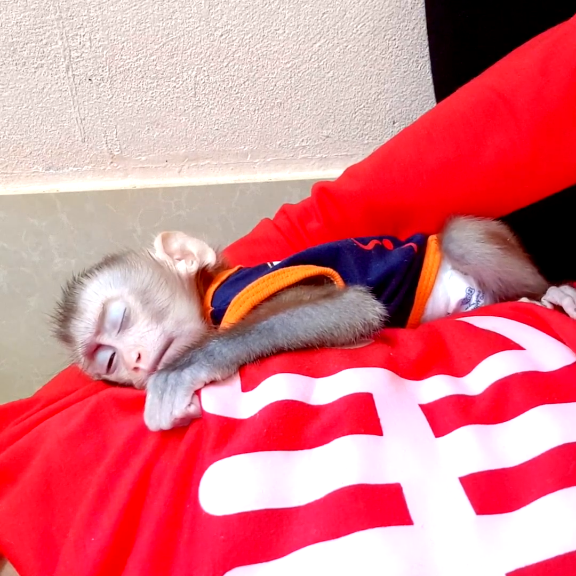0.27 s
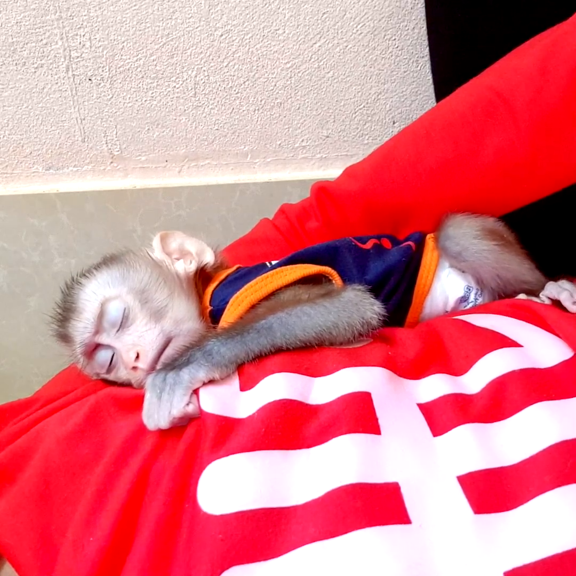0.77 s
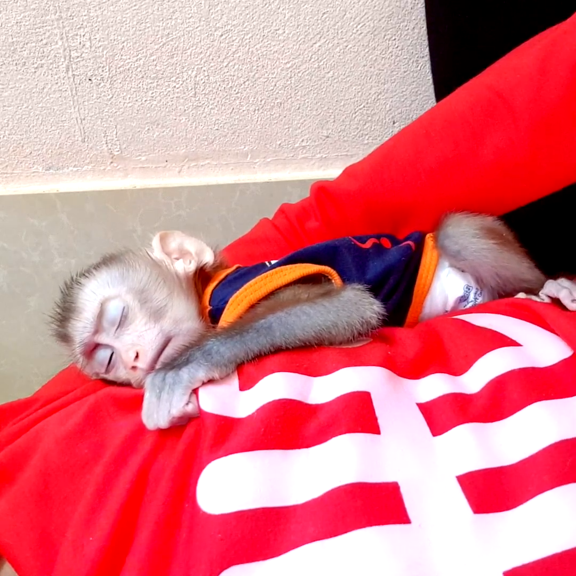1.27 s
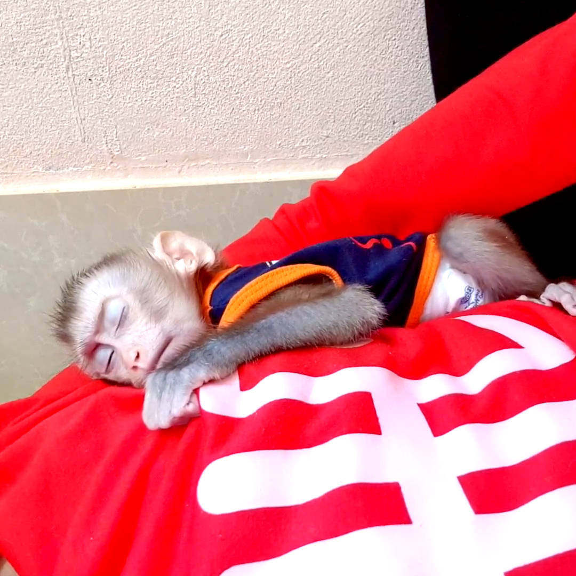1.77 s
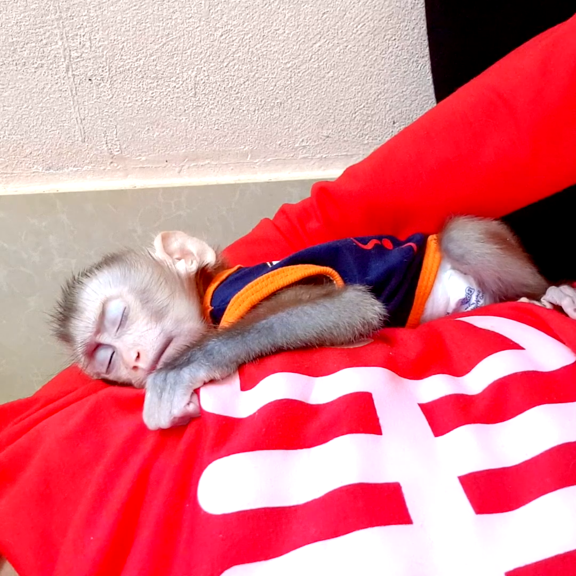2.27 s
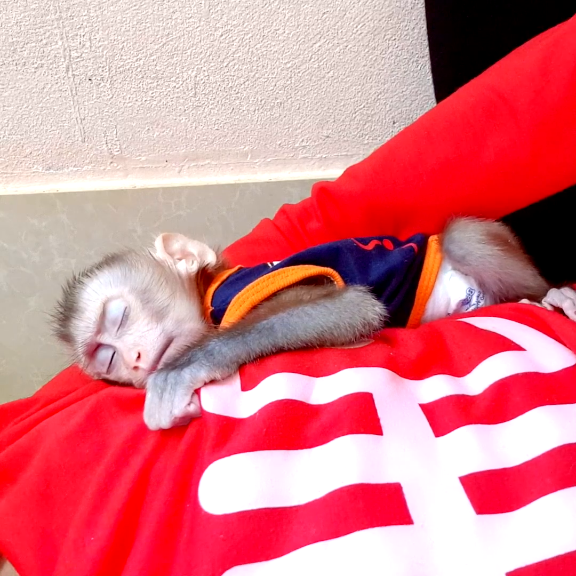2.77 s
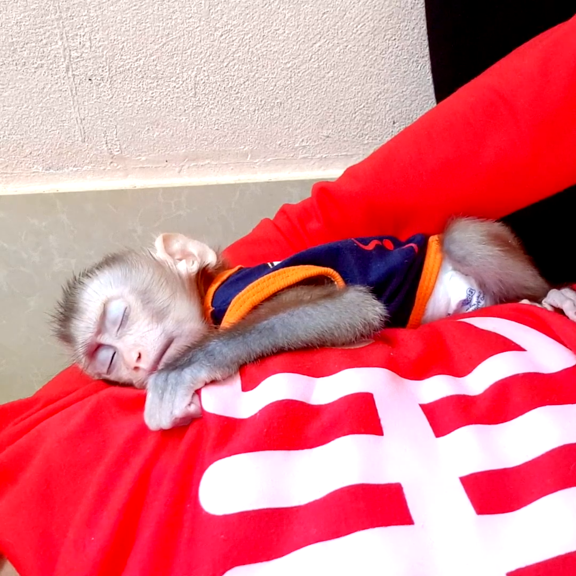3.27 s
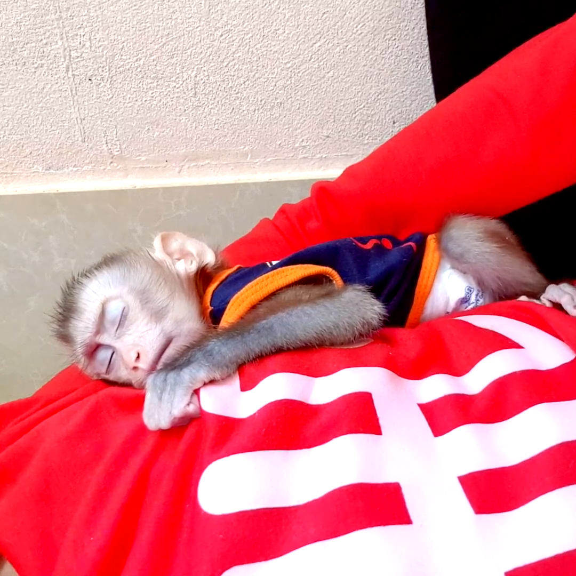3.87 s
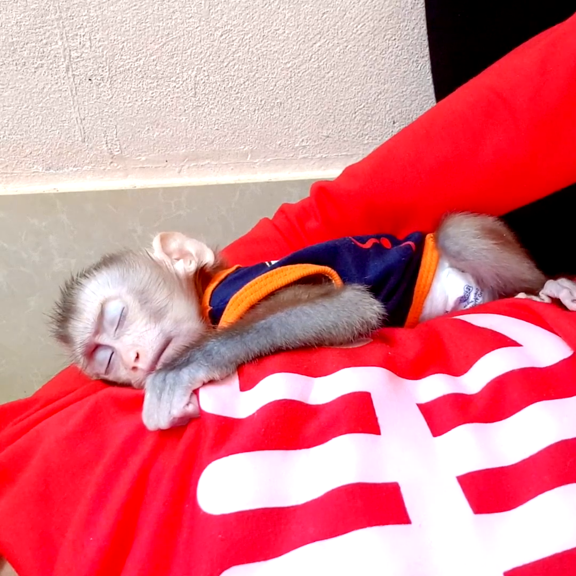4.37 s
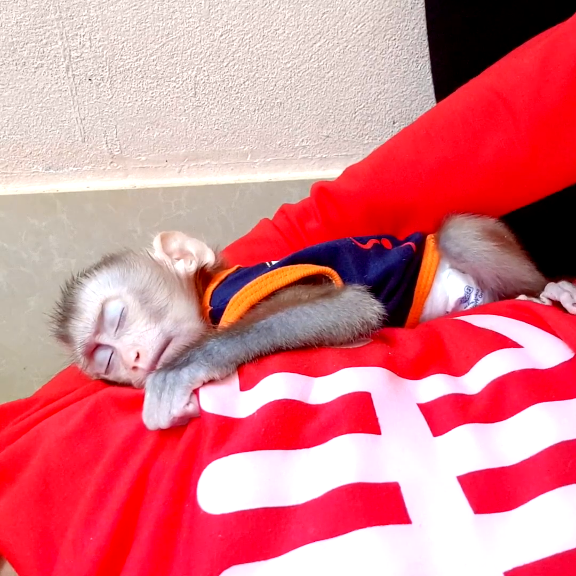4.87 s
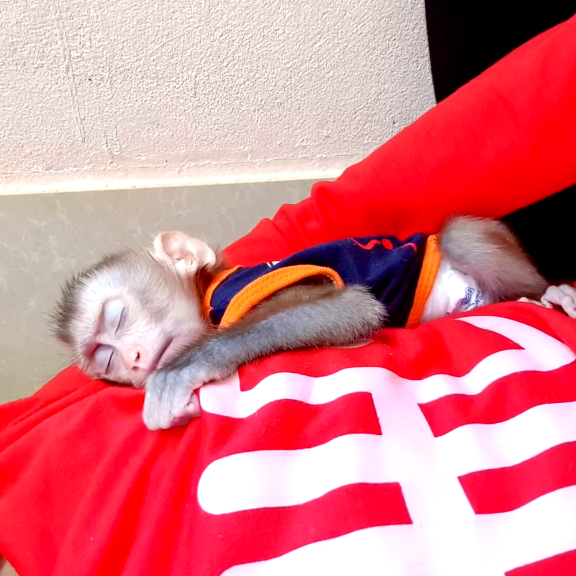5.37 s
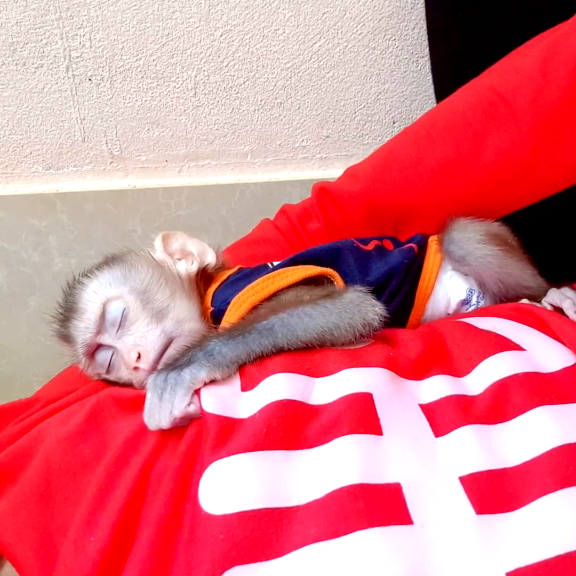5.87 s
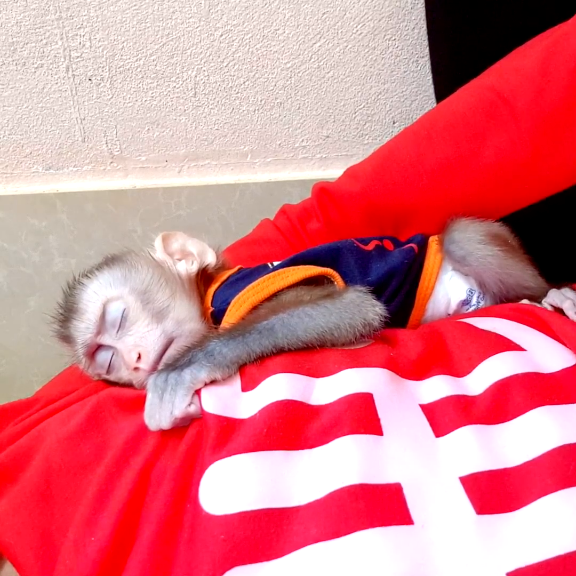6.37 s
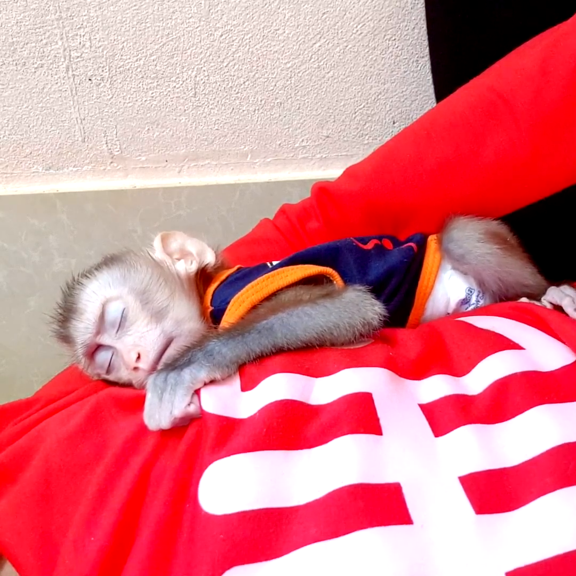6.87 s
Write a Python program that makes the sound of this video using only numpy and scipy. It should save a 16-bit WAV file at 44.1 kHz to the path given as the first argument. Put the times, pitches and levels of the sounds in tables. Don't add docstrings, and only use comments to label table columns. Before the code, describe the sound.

A far animal repeats a squeaky rising call breaking into a hoarse two-toned bray, echoing over a steady low machine hum and room noise.

```python
import sys
import numpy as np
from scipy import signal
from scipy.fft import rfft, irfft, next_fast_len
from scipy.io import wavfile
from scipy.ndimage import map_coordinates

SR = 44100
rng = np.random.default_rng(int(sys.argv[2]) if len(sys.argv) > 2 else 0)


def gain_from_db(level_db):
    decades = np.asarray(level_db, float) / 20
    return 10 ** decades


def log_audio(samples):
    frames = np.atleast_2d(samples).T
    limited = np.clip(frames, -1, 1)
    pcm = np.round(limited * 32767).astype(np.int16)
    wavfile.write(sys.argv[1], SR, pcm)


N = 313110
TIME = np.arange(N) / SR


def unit(x):
    return x / np.sqrt(np.mean(x ** 2) + 1e-20)


def along(points, hz):
    f, value = np.transpose(points)
    return np.interp(np.log(hz + 1), np.log(f + 1), value)


def wobble(rate):
    knots = rng.standard_normal(int(N * rate / SR) + 4)
    return map_coordinates(knots, [np.arange(N) * rate / SR])


def phase(hz):
    return 2 * np.pi * np.cumsum(hz) / SR


def filtered(x, response):
    m = next_fast_len(N + 8192)
    return irfft(rfft(x, m) * response(np.fft.rfftfreq(m, 1 / SR)), m)[..., :N]


def noise(spectrum):
    return unit(filtered(rng.standard_normal(N), lambda hz: gain_from_db(along(spectrum, hz))))


def spans(starts, lengths, fade):
    k = np.clip(np.searchsorted(starts, TIME + .02) - 1, 0, None)
    age = TIME - starts[k]
    return k, age, np.clip(np.minimum(age + fade, lengths[k] + fade - age) / fade, 0, 1)


# f/Hz, correlation
LIKENESS = [(60, 0.7097), (180, 0.9273), (550, 0.5242), (1650, -0.238), (4970, 0.191), (15000, -0.165)]


def rush(spectrum):
    def colour(hz):
        turn = np.arccos(np.clip(along(LIKENESS, hz), -1, 1)) / 2
        return gain_from_db(along(spectrum, hz)) * [np.cos(turn), np.sin(turn)]

    mid, side = filtered(rng.standard_normal((2, N)), colour)
    return unit(np.array([mid + side, mid - side]))


# f/Hz, level/dB per Hz
RUMBLE_COLOUR = [(22, -47.5), (35, -8), (48, 0), (70, 3.5), (100, 0), (130, -3.5), (170, -9), (220, -22),
                 (400, -21.5), (500, -54)]
# t/s, level/dB
TRAFFIC = [
    (0.15, -53),
    (1.74, -53),
    (1.76, -55.5),
    (2.31, -51.5),
    (3.48, -54),
    (3.96, -52),
    (4.41, -55),
    (6.13, -52.5),
    (6.95, -54),
]
# f/Hz, level/dB per Hz
AIR_COLOUR = [(120, -36), (200, -6), (290, -5.5), (330, -10.5), (420, -6.5), (560, -10.5), (800, -7),
              (1100, -9.5), (1600, -15.5), (2000, -18), (2500, -23), (3100, -32.5), (4200, -47),
              (6000, -85.5)]
# f/Hz, level/dB per Hz
HISS_COLOUR = [(2500, -43.5), (3500, 2), (5500, 2), (7000, 3), (8800, -29.5), (10200, -4.5), (11500, 0.5),
               (15800, 1)]


def room():
    times, levels = np.transpose(TRAFFIC)
    swell_db = np.interp(TIME, times, levels)
    swell_db = swell_db - swell_db.mean()
    rumble = gain_from_db(-50.5 + swell_db) * rush(RUMBLE_COLOUR) * gain_from_db([[-1.2], [1.2]])
    hiss = gain_from_db(-77) * np.array([noise(HISS_COLOUR), noise(HISS_COLOUR)])
    air = gain_from_db(-57.5 + 0.067 * swell_db) * rush(AIR_COLOUR)
    return rumble + hiss + air


# f/Hz, level/dB, left-right/dB, left lead/rad, level sway/0-1, sway start/rad,
# pitch sway/rad, pitch sway start/rad
SHAFT_ORDERS = [
    (38.5, -50, -5.3, .66, .14, -2.1, .08, -.95),
    (77.0, -46, -3.3, .34, .24, 2.63, .75, .84),
    (115.5, -66, -2, .3, .2, 0, .3, 0),
]
# f/Hz, level/dB
SIDE_TONES = [(43.7, -70.5), (94.7, -67.5), (100, -58.5), (130.8, -72.5), (177, -70.5)]


def machine():
    out = np.zeros((2, N))
    belt = 2 * np.pi * 3.05 * TIME
    ports = np.array([[.5], [-.5]])
    for hz, db, pan_db, lead, sway, start, swing, swing_start in SHAFT_ORDERS:
        turn = 2 * np.pi * hz * TIME + swing * np.sin(belt + swing_start) + lead * ports
        level = gain_from_db(db + 3 + pan_db * ports + .4 * wobble(3))
        out += level * (1 + sway * np.cos(belt + start)) * np.sin(turn)
    for hz, db in SIDE_TONES:
        out += gain_from_db(db + 3 + 1.2 * wobble(2)) * np.sin(2 * np.pi * hz * TIME + .25 * ports)
    return out


# peak t/s, level/dB, rise/s per 10 dB, fall/s per 10 dB
TONE_SWELLS = [
    (1.3, -52, 0.0397, 0.0556),
    (2.45, -52, 0.40533, 0.115),
]


def passing_tone():
    level = 0
    for peak_s, db, rise_s, fall_s in TONE_SWELLS:
        away = np.maximum((peak_s - TIME) / rise_s, (TIME - peak_s) / fall_s)
        level = level + gain_from_db(db + 4.0 - 10 * away)
    return level * np.sin(phase(151 + 1.2838 * wobble(3.9713)))


# t/s, f/Hz, level/dB, t60/s
BUMP = (3, 67, -41, 0.003)


def bump():
    start_s, hz, db, t60 = BUMP
    age = np.clip(TIME - start_s, 0, None)
    return gain_from_db(db - 60 * age / t60) * (1 - np.exp(-age / 0.0082)) * np.sin(2 * np.pi * hz * age)


# t/s, length/s, level/dB, lower edge f/Hz, upper roll-off f/Hz
NOSE_PUFFS = [
    (1.652, 0.28113, -68.5, 4148, 5447),
    (2.27, 0.2463, -57, 3849, 5982),
    (3.501, 0.2543, -61, 1822, 2164),
    (6.93, 0.3322, -52, 3835, 4218),
]


def puffs():
    out = np.zeros((2, N))
    for start, length, db, low_hz, top_hz in NOSE_PUFFS:
        air = filtered(rng.standard_normal((2, N)),
                       lambda f: 1 / (1 + (low_hz / (f + 1)) ** 24) / (1 + (f / top_hz) ** 7))
        attack = np.clip((TIME - start) / 0.03374, 0, 1)
        release = np.clip((start + length - TIME) / 0.20976, 0, 1)
        out += gain_from_db(db) * unit(air) * attack * release
    return out


# f/Hz, t60/s
YARD_DECAY = [(700, 0.9506), (2000, 0.88425), (5000, 0.64136), (12000, 0.3076)]


def yard(x):
    out = np.zeros((2, N + 2 * SR))
    step = SR // 4
    window = np.hanning(2 * step)
    for at in range(-step, N, step):
        first = max(at, 0)
        part = x[first:at + 2 * step] * window[max(-at, 0):][:N - first]
        hz, t, z = signal.stft(rng.standard_normal((2, SR)), SR, nperseg=256)
        t60 = np.clip(along(YARD_DECAY, hz), .05, 3)
        tail = signal.istft(z * gain_from_db(-60 * t / t60[:, None]), SR, nperseg=256)[1]
        tail = tail / np.sqrt(t60.mean()) / np.sqrt(SR / 14)
        wet = signal.fftconvolve(part[None], tail, axes=1)
        out[:, first:][:, :wet.shape[1]] += wet
    return out[:, :N]


# t/s, length to the release/s, peak level/dB, brightness/dB
BREATHS = [
    (-.5, 0.47194, -52.5, -26.5),
    (.55, .465, -46, -11.5),
    (2.22, 0.3298, -54.5, -19),
    (2.469, 0.3573, -46.5, -13),
    (3.835, 0.4662, -51, -12),
    (5.023, 0.50688, -48.5, -9.5),
    (6.201, 0.71167, -49.5, -11),
]
# f/Hz, level/dB per Hz
THROAT_COLOUR = [(520, -29), (700, -20.5), (850, -7.5), (1100, -0.5), (1410, -8.5), (1700, -11), (1910, -8),
                 (2230, -14.5), (2650, -17.5), (3400, -20), (4500, -21), (6500, -24), (8000, -35),
                 (10400, -109)]
# f/Hz, level/dB per Hz
RASP_COLOUR = [(6000, -4.5), (7800, -4), (9000, -7.5), (10500, -6), (11500, -9), (12500, -12),
               (15500, -44.5)]


def hoarse():
    flow, rasp = np.zeros((2, N))
    attack_s, full_s, release_s = 0.044424, 0.21545, 0.19406
    for start, length, db, bright_db in BREATHS:
        age = TIME - start
        spent = np.clip((age - length) / release_s, 0, 1)
        arc_db = np.interp(age, [0, attack_s, full_s, length, length + release_s],
                           [-26, -6.5, 0, -7.5, -34])
        air = (age > 0) * (spent < 1) * gain_from_db(db + arc_db)
        forced_db = 13 * np.exp(-((age - 0.12099) / 0.05452) ** 2)
        flow += air
        rasp += air * gain_from_db(bright_db + forced_db - 34.5 * spent)
    unsteady = gain_from_db(4.046 * wobble(30))
    return unsteady * (flow * gain_from_db(7.0) * noise(THROAT_COLOUR) + rasp * gain_from_db(-4.5) * noise(RASP_COLOUR))


# t/s, top line f/Hz, then peak level/dB of the upper, middle and lower lines
BRAY_CALLS = [
    (-.31, 2181, -50, -46, -50),
    (0.798, 2201, -52, -56, -55.5),
    (2.25, 2188, -57.5, -51, -60.5),
    (4.031, 2179, -50, -50.5, -55.5),
    (5.252, 2189, -46, -54, -58),
    (6.521, 2146, -45, -56.5, -52),
]
# f/Hz, level/dB
UPPER_LINES = [(2195, 2.5), (4390, -12.5)]
MIDDLE_LINES = [(1620, 0), (1905, 2), (2465, -9.5), (2760, -20.5), (3830, -15.5), (4110, -14.5)]
LOWER_LINES = [(570, -15), (860, -2), (1020, -5.5), (1090, -3.5), (1315, 1.5)]
# peak at share of the length, gain before/dB, loss after/dB
GROUP_ARCS = [(0.33733, 22, 22), (0.1899, 5.5, 15.5), (0.658, -2.5, 3.5)]


def bray():
    length_s, attack_s = 0.36495, 0.01896
    starts, top_hz, *peaks = np.transpose(BRAY_CALLS)
    k, age, gate = spans(starts, np.full(len(starts), length_s), fade=0.016)
    slide = top_hz[k] / 2195
    out = 0
    for table, peak_db, arc in zip((UPPER_LINES, MIDDLE_LINES, LOWER_LINES), peaks, GROUP_ARCS):
        at, gain_db, loss_db = arc
        group_db = peak_db[k] + np.interp(age / length_s, [0, at, 1], [-gain_db, 0, -loss_db])
        lines = 0
        for hz, db in table:
            tremor = gain_from_db(db + 5 * wobble(35))
            lines = lines + tremor * np.sin(phase(hz * (slide + .007 * wobble(70))))
        out = out + gain_from_db(group_db + 3.5) * lines
    return gate * np.clip(age / attack_s, 0, 1) * out


# t/s, rise to the peak/s, peak level/dB, first pitch f/Hz, overtone gain/dB an octave
SQUEAK_CALLS = [
    (0.546, .145, -35, 1056, -0.5),
    (2.4, 0.22596, -36, 1110, -0.5),
    (3.848, 0.14726, -39, 1060, 1.5),
    (5.035, 0.15045, -36, 1066, 1.5),
    (6.225, .15, -36, 1052, 1),
]
# multiple, level/dB
SQUEAK_OVERTONES = [(1, -1.5), (2, -7), (3, -11.5), (4, -16.5), (5, -29), (6, -27), (7, -50), (8, -33),
                    (9, -38.5), (10, -42.5)]
# rate f/Hz, first pulse t/s after the start
SQUEAK_THROB = (33.426, 0.093541)


def squeak():
    sag_rises = 1.25
    starts, rise, peak_db, first_hz, tilt_db = np.transpose(SQUEAK_CALLS)
    k, age, gate = spans(starts, rise * (1 + sag_rises), fade=0.012)
    before = np.clip(1 - age / (.75 * rise[k]), 0, 1)
    after = np.clip(age / rise[k] - 1, 0, sag_rises)

    climb_hz = (1146.9 - first_hz[k]) * np.clip(1 - age / rise[k], 0, 1) ** 1.9
    sag_hz = 89.587 * np.sin(np.pi / 2 * after / sag_rises) ** 1.7
    turn = phase((1146.9 - climb_hz - sag_hz) * (1 + 0.0042108 * wobble(70)))

    db = peak_db[k] - 12 * before - 15.5 * after
    throb_hz, first_pulse_s = SQUEAK_THROB
    throb_depth_db = 4 + 5.5 * np.exp(-((age - .1) / 0.04618) ** 2)
    throb_db = throb_depth_db * np.cos(2 * np.pi * throb_hz * (age - first_pulse_s))
    closed_db = 14 * np.exp(-np.abs(age) / .04)
    stack = 0
    for n, level in SQUEAK_OVERTONES:
        bloom_db = .5 * np.log(n) * (db + 36) + np.log2(n) * tilt_db[k]
        stack = stack + gain_from_db(level + bloom_db - closed_db * (n > 2) + throb_db / n) * np.sin(n * turn)

    early, late = 0.136, 0.3863
    flutter = late - (late - early) * np.clip(3 * before, 0, 1)
    beat = np.exp(2.5 * np.cos(turn / 7))
    fluttering = 1 + np.clip(flutter, 0, 1) * unit(beat - beat.mean())
    return filtered(gate * gain_from_db(db + 2.5 + 2.2 * wobble(45)) * stack * fluttering, mouth)


def mouth(f):
    centre_hz, wide_hz = 1096.8, 44.61
    ring = 1j * f * wide_hz / (centre_hz ** 2 - f * f + 1j * f * wide_hz)
    return (1 + gain_from_db(1.5) * ring) / (1 + (880 / (f + 1)) ** 8)


def scene():
    call = squeak() + bray() + hoarse()
    late = np.pad(call, (16, 0))[:N]
    direct = gain_from_db([[-5.5], [-4]]) * np.array([late, call])
    echoes = gain_from_db(-0.4081) * yard(call) * gain_from_db([[-.4], [.4]])
    return direct + echoes + puffs() + machine() + passing_tone() + bump() + room()


def roll_off(x):
    return signal.sosfilt(signal.butter(12, 15740, fs=SR, output="sos"), x)


def record(dry):
    return roll_off(dry)


dry = scene()
out = record(dry)
log_audio(out)
```